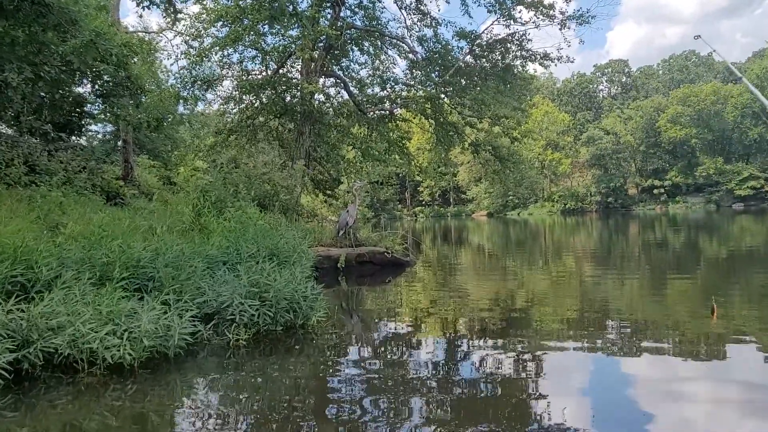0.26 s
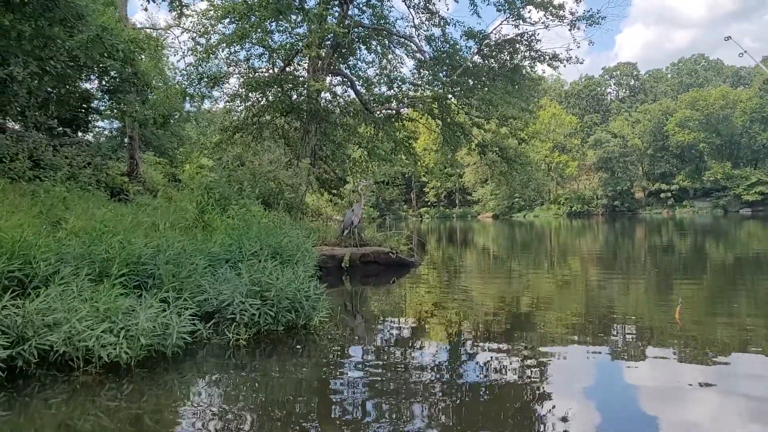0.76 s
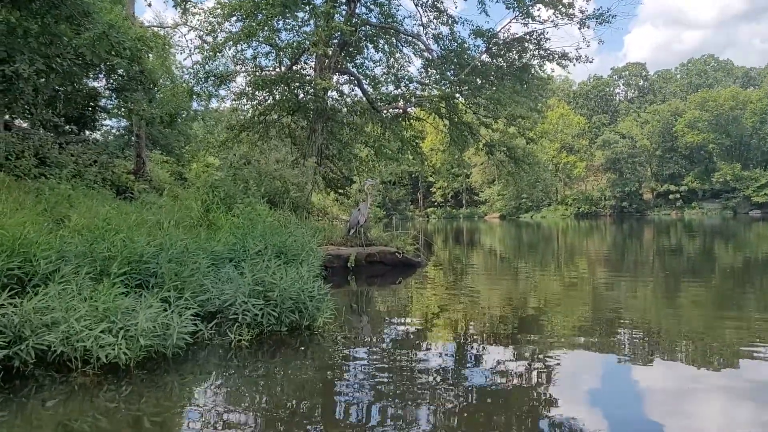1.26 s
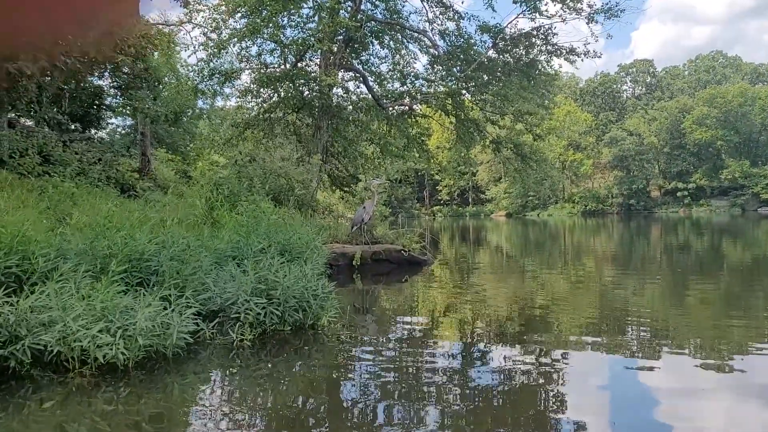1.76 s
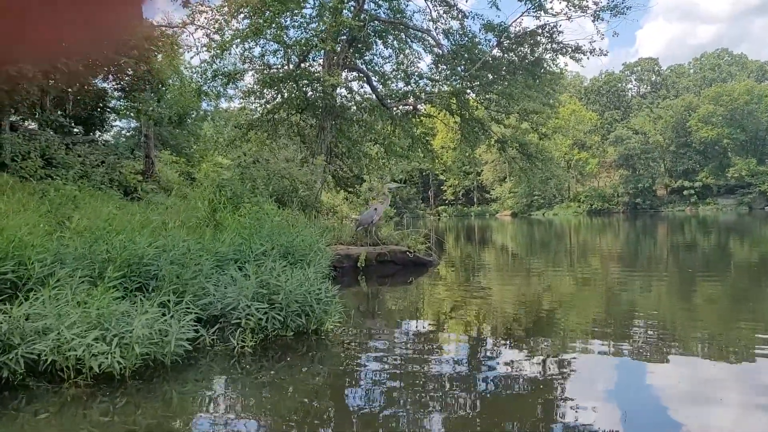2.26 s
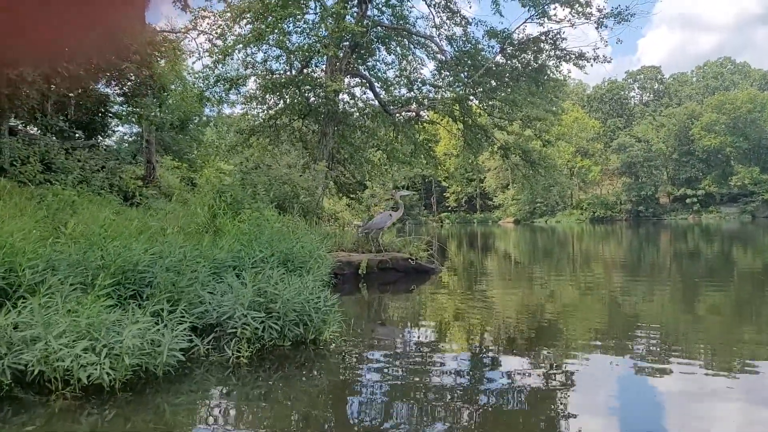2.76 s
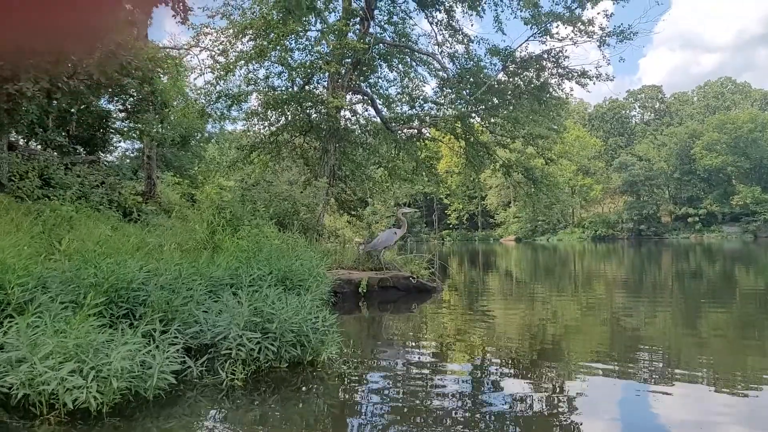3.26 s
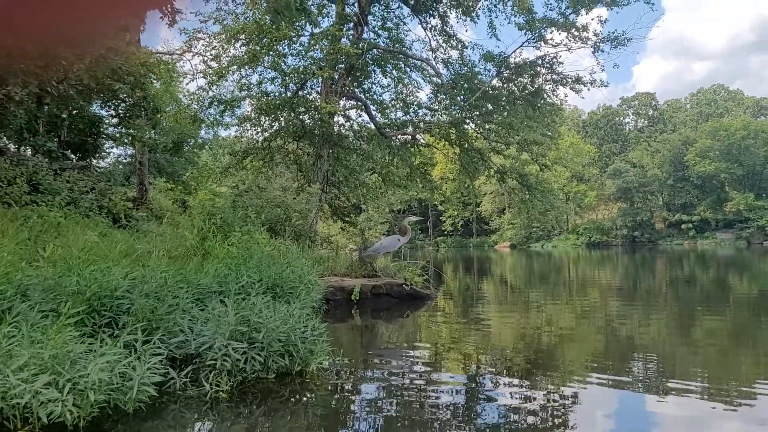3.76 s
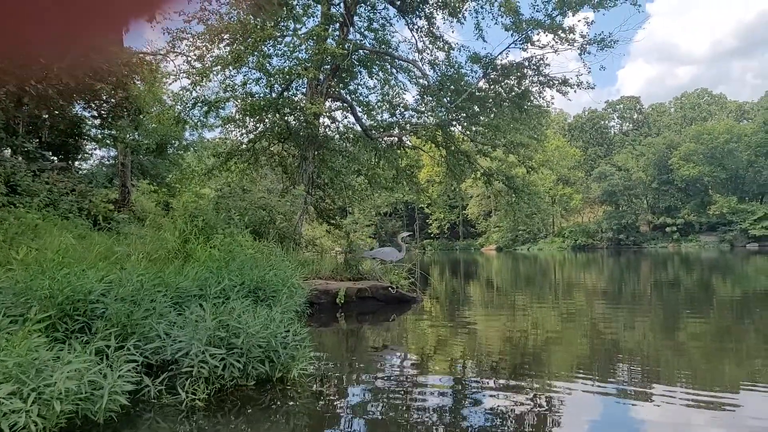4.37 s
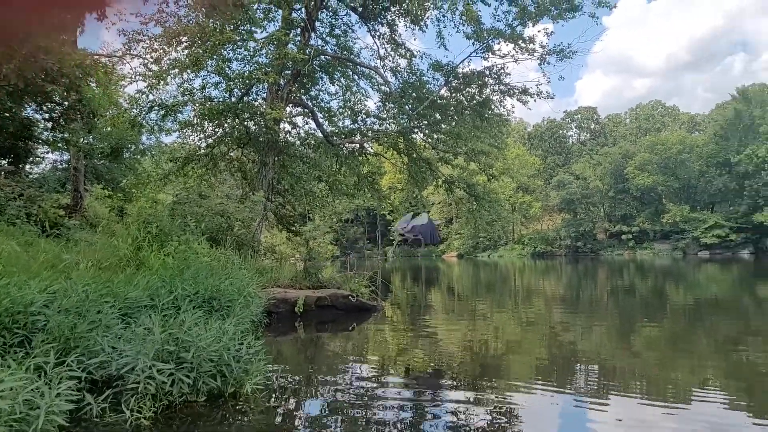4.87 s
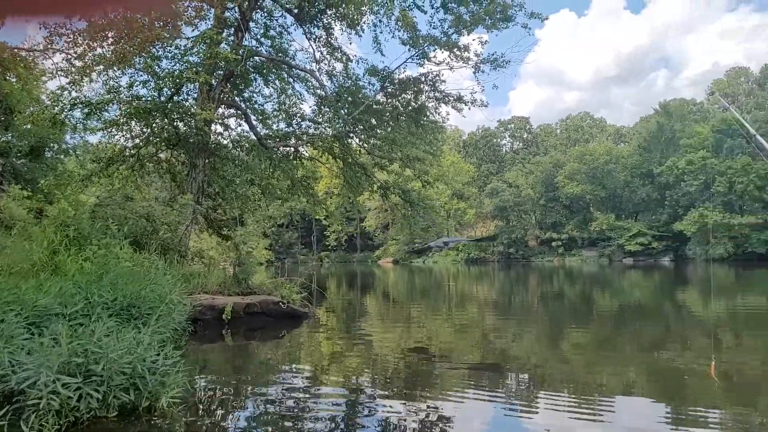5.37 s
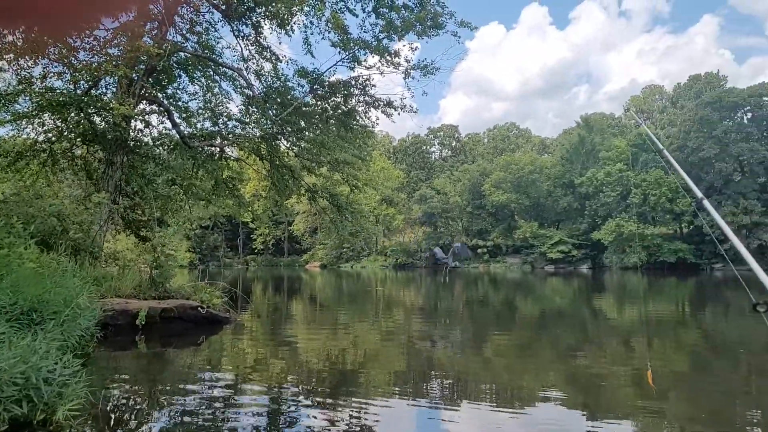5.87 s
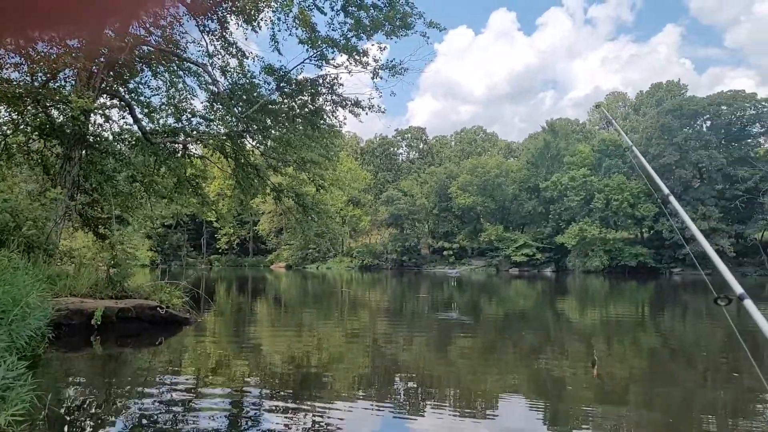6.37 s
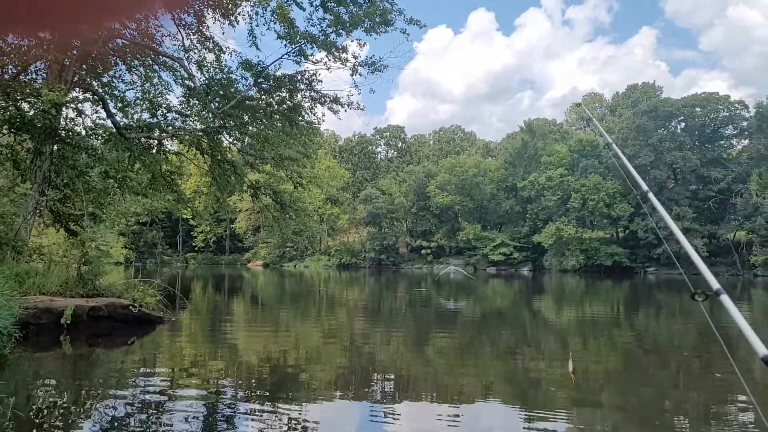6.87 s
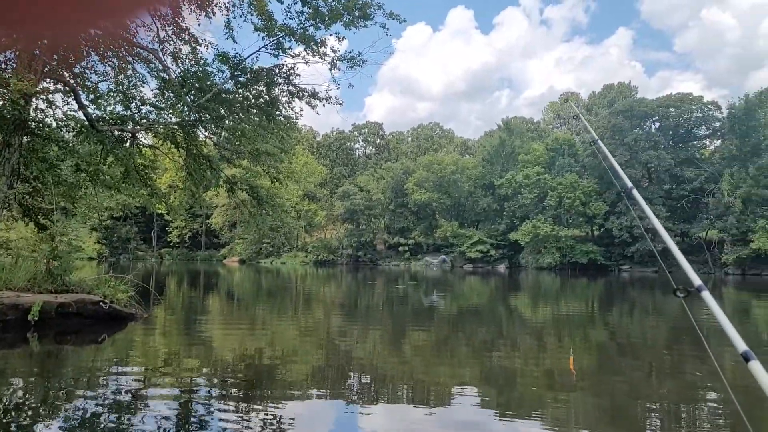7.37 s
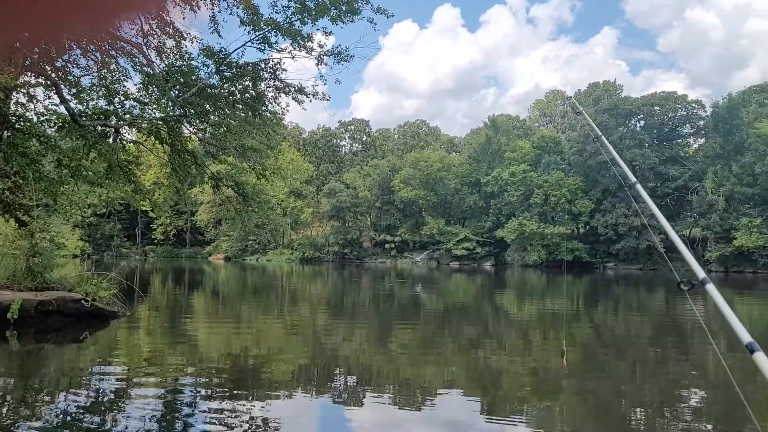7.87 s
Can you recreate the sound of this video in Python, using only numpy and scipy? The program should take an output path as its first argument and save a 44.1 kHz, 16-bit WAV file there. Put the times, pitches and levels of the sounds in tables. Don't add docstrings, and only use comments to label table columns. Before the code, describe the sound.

A bright, raspy cicada dominates, faltering and swelling before holding its drone, with a softer distant insect chorus around it. Dry little ticks, one sharp snap and faint rustles sit very close to a handheld stereo microphone. Small rising bird whistles come from afar. In the second half a large bird croaks five times, hoarse and throaty, across open water with slight bank echo, over faint rumble and engine hum.

```python
import sys
import numpy as np
from scipy import signal
from scipy.fft import rfft, irfft
from scipy.io import wavfile
from scipy.ndimage import uniform_filter1d, map_coordinates

SR = 44100
rng = np.random.default_rng(int(sys.argv[2]) if len(sys.argv) > 2 else 0)


def to_wav(s):
    ch = np.atleast_2d(s).T
    pcm = np.round(np.clip(ch, -1, 1) * 32767)
    wavfile.write(sys.argv[1], SR, pcm.astype(np.int16))


def to_linear_factor(level_db):
    exponent = np.asarray(level_db, float) / 20
    return 10 ** exponent


N = 358091
TIME = np.arange(N) / SR


def unit(x):
    return x / np.sqrt(np.mean(x ** 2) + 1e-20)


def read(rows, t):
    s, *cols = np.transpose(rows)
    return [np.interp(t, s, c) for c in cols]


def along(points, hz):
    f, v = np.transpose(points)
    return np.interp(np.log(hz + 1), np.log(f + 1), v)


def wobble(rate):
    return map_coordinates(rng.standard_normal(int(N * rate / SR) + 4), [TIME * rate])


def beats(rate, t):
    total = np.cumsum(rate) / SR
    return np.interp(np.arange(int(total[-1]) + 1), total - total[0], t)


def rings(s, hz, size, t60, rise, phase=0, count=144):
    s, hz, size, phase = (np.reshape(v, (-1, 1)) for v in np.broadcast_arrays(s, hz, size, phase))
    index = np.ceil(s * SR) + np.arange(count)
    t = index / SR - s
    envelope = size * to_linear_factor(-60 * t / t60) * (1 - np.exp(-t / rise)) ** 2
    wave = envelope * np.sin(2 * np.pi * (hz * t + phase))
    return np.bincount(index.astype(int).ravel(), wave.ravel(), N + SR)[:N]


def rush(spectrum, alike, patchy_db):
    hz, _, z = signal.stft(rng.standard_normal((2, N)), SR, nperseg=2048)
    patches = uniform_filter1d(rng.standard_normal(z.shape[1:]), size=8, axis=0)
    patches = uniform_filter1d(patches, size=4, axis=1)
    turn = np.arccos(np.clip(along(alike, hz), -1, 1))[:, None] / 2
    mid, side = z[0] * np.cos(turn), z[1] * np.sin(turn)
    gain_db = along(spectrum, hz)[:, None] + patchy_db * unit(patches)
    z = np.array([mid + side, mid - side]) * to_linear_factor(gain_db)
    return unit(signal.istft(z, SR, nperseg=2048)[1][:, :N])


def scatter(x, t60, count):
    tail = rng.standard_normal((2, count)) * to_linear_factor(-60 * np.arange(count) / SR / t60)
    return signal.fftconvolve(x[None], tail / np.linalg.norm(tail[0]), axes=1)[:, :N]


def swaying(x, t60, sway):
    turn = 2 * wobble(sway)
    return scatter(x * np.cos(turn), t60, count=3072) + scatter(x * np.sin(turn), t60, count=3072)


def placed(x, pan_db, count=0):
    return np.array([x * to_linear_factor(pan_db / 2), np.roll(x, count) * to_linear_factor(-pan_db / 2)])


def cicada():
    # start_s, buckles_per_s
    buckling = [(0, 337), (.4, 334), (.7, 333.4), (.95, 329), (1.45, 327), (2.2, 324), (3.2, 316),
                (3.7, 310), (4.1, 306), (4.4, 309), (4.5, 306), (4.95, 305), (5.15, 301.4), (5.4, 304),
                (5.6, 302), (5.77, 304), (6.45, 306.6), (8.2, 306.1)]
    # start_s, tymbal_hz, left_right_db,
    # belly_lift_db
    tone_and_place = [(0.0, 12460, -2.5, -11), (1.1, 13130, -6.5, -12.5), (1.72, 12920, -1, -17),
                      (2.08, 12980, 3, -16.5), (3.2, 12250, 3.5, -19), (4.27, 12350, 5.5, -14.5),
                      (5.25, 12660, 3, -12.5), (8.12, 12350, 5.5, -12)]
    # delay_ms, level_db, relative_pitch
    ribs = [(0, -5, 1.03), (1.078, -0.5, 0.997), (2.148, -5, 0.962)]
    # pitch_hz, level_db
    belly = [(4050, -7), (4560, 0), (5200, -12)]
    # start_s, end_s
    in_step = [(.3, .7), (6.805, 8.2)]
    s = beats(read(buckling, TIME)[0] + .35 * wobble(8), TIME)
    steady = sum((s > a) & (s < b) for a, b in in_step)
    phase = np.cumsum(.5 - .5 * steady)[:, None]
    delay_ms, rib_db, rib_pitch = np.transpose(ribs)
    chance = rng.standard_normal((len(s), 4, len(ribs)))
    struck = s[:, None] + delay_ms / 1000 * (1 + .012 * chance[:, 3]) + 9e-6 * chance[:, 0]
    size = to_linear_factor(rib_db + 1.8 * chance[:, 1])
    level_db = effort()
    effort_db = np.interp(struck, TIME, level_db - uniform_filter1d(level_db, size=SR // 2))
    tymbal_hz = read(tone_and_place, struck)[0] * rib_pitch * (1 + 0.011 * chance[:, 2])
    tymbal_hz *= 1 + .006 * np.clip(effort_db, -10, 5)
    _, pan_db, belly_db = read(tone_and_place, TIME)
    song = unit(rings(struck, tymbal_hz, size, 0.0029, 0.0006, phase))
    song += to_linear_factor(-18) * unit(rings(struck, 1.18 * tymbal_hz, size, 0.0025, 0.00074, phase))
    song += to_linear_factor(-11.5) * unit(rings(struck, 0.71 * tymbal_hz, size, 0.0041, 0.00013, 2 * phase))
    first = struck[:, :1]
    tension = read(tone_and_place, first)[0] / 12475
    for hz, db in belly:
        thump = rings(first, hz * tension, size[:, :1], .008, .0009, phase, count=384)
        song += to_linear_factor(belly_db + db) * unit(thump)
    song *= to_linear_factor(level_db)
    heard = placed(song, 7, count=16) + to_linear_factor([[-3], [-1.5]]) * swaying(song, .06, 5)
    return to_linear_factor(-0.77) * heard * to_linear_factor([pan_db / 2, -pan_db / 2])


def effort():
    # start_s, level_db
    pull = [(0, -34.5), (0.5, -38), (1.6, -34), (2.3, -38.5), (2.75, -38), (3.05, -32), (4.6, -34.5),
            (5.08, -32.5), (5.25, -34), (5.8, -32), (6.33, -30.5), (6.5, -32.5), (8.12, -34.5)]
    # deepest_s, fall_s, recovery_s, depth_db
    falters = [(0.06, 0.19, 0.072, 14), (0.334, 0.091, 0.04, 24), (0.399, 0.05, 0.1, 23.2),
               (0.815, 0.056, 0.15, 6), (1.446, 0.14, 0.059, 4), (1.625, 0.044, 0.15, 6),
               (1.855, 0.043, 0.035, 3.5), (2.04, 0.071, 0.22, 6), (2.511, 0.12, 0.049, 16),
               (2.57, 0.018, 0.122, 5), (2.882, 0.112, 0.11, 16), (3.024, 0.023, 0.11, 11),
               (3.226, 0.14, 0.075, 13), (3.406, 0.057, 0.133, 8.5), (3.597, 0.14, 0.023, 5.5),
               (3.814, 0.079, 0.077, 11), (3.908, 0.037, 0.1, 9.5), (4.214, 0.1, 0.071, 6.5),
               (4.33, 0.074, 0.055, 6), (4.575, 0.022, 0.098, 1.9), (4.699, 0.092, 0.082, 7),
               (4.875, 0.12, 0.101, 15), (5.827, 0.019, 0.22, 3), (6.805, 0.015, 0.019, 14),
               (7.368, 0.041, 0.039, 3)]
    level_db = read(pull, TIME)[0] + 1.6
    for s, fall, recovery, depth_db in falters:
        away = np.maximum((s - TIME) / fall, (TIME - s) / recovery)
        level_db = level_db - depth_db * np.cos(np.pi / 2 * np.minimum(away, 1)) ** 2
    return level_db


def heron():
    # start_s, level_db, flaps_per_s, harshness (0-1), chest_hz
    croaks = [
        [(5.082, -45.5, 90, 0.6, 770), (5.123, -33, 70, 0.2, 805), (5.21, -39, 81, 0.76, 815),
         (5.29, -36, 69.6, 0.99, 853), (5.35, -32, 71, 0.23, 830), (5.47, -28, 88, 0, 870),
         (5.56, -32.5, 66.5, 0.7, 950), (5.627, -29, 67.6, 0, 926), (5.66, -36.5, 59, 0.35, 870)],
        [(5.833, -37, 52.3, .15, 817), (5.94, -35.5, 69, 0.26, 880), (6.01, -35.5, 48, 0.12, 860)],
        [(6.193, -42, 70, 0.27, 780), (6.29, -36.5, 66, 0.38, 855), (6.38, -43, 68, 0.4, 855)],
        [(6.905, -37.5, 66, 0.36, 825), (6.99, -33, 53, 0.11, 873), (7.12, -34, 54, 0.19, 863),
         (7.265, -43, 51, 0.49, 830)],
        [(7.832, -45.5, 52, 0.27, 820), (7.9, -37, 70, 0.1, 840), (7.977, -31.5, 85.5, 0.22, 1225),
         (8.017, -29.5, 74, 0.11, 1050), (8.04, -34, 69, 0.77, 790)],
    ]
    # low_mode_db, beak_mode_db, rasp_db
    voicing = [(-18, -21, -12), (-15.5, -18.5, -21), (-16.5, -22.5, -19), (-21, -12.5, -16),
               (-37, -11.5, -14)]
    # start_s, level_db
    grunt = [(4.912, -33), (4.925, -31)]
    voice = sum(croak(rows, *throat) for rows, throat in zip(croaks, voicing))
    s, db = np.transpose(grunt)
    voice += rings(s, 453, to_linear_factor(db), 0.025, 0.0012, count=2048)
    voice += rings(s, 776, to_linear_factor(db - 5.5), 0.032, 0.00061, count=2048)
    voice += to_linear_factor(-12) * np.roll(voice, round(.0075 * SR))
    return placed(voice, 4.5, count=4) + to_linear_factor(-14) * scatter(voice, .15, count=8000)


def croak(rows, low_db, open_db, rasp_db):
    # pitch_hz, t60_s
    throat_modes = [(500, .045), (1530, .024), (1210, .02)]
    # pitch_hz, level_db
    rasp_modes = [(1850, -2.5), (2050, -5.5), (2250, 0.5), (2500, -1.5), (2750, -0.5), (2950, 0),
                  (3200, -4.5), (3500, -6)]
    chest_t60 = .021
    t = np.arange(rows[0][0], rows[-1][0], 1 / SR)
    s = beats(2 * read(rows, t)[1], t)
    chance = rng.standard_normal((len(s), 5 + 3 * len(rasp_modes)))
    chest_db, _, harsh, chest_hz = read(rows, s)
    harsh = np.clip(harsh, 0, 1)
    done = (s - t[0]) / (t[-1] - t[0])
    low_db = low_db + 12 * harsh
    open_db = open_db + 20 * np.log2(chest_hz / 830) + 2.5 * done ** 2
    rasp_db = rasp_db + 8.5 * harsh - 17.5 * (done - 0.27) ** 2
    s = s + 0.00208 * harsh * chance[:, 0]
    size = np.where(np.arange(len(s)) % 2, harsh, 1) * to_linear_factor(chest_db + 15.5 + 1.65 * chance[:, 1])
    voice = rings(s, chest_hz * (1 + .03 * chance[:, 2]), size, chest_t60, .0016, count=1024)
    voice += rings(s, 0.9 * chest_hz, size * to_linear_factor(-5), chest_t60, 0.0016, count=1024)
    for k, ((hz, t60), db) in enumerate(zip(throat_modes, (low_db, open_db, open_db - 1))):
        mode_hz = hz * (1 + .03 * chance[:, 3 + k % 2])
        voice += rings(s, mode_hz, size * to_linear_factor(db), t60, .002, count=1536)
    late, detune, strength = np.split(chance[:, 5:], 3, axis=1)
    rasp_hz, mode_db = np.transpose(rasp_modes)
    spray = (size * to_linear_factor(rasp_db - 6.5))[:, None] * to_linear_factor(mode_db + 2.1 * strength)
    unswelled = np.exp((t[0] - s[:, None]) / 0.075)
    spray *= to_linear_factor(-16 * unswelled * (rasp_hz - rasp_hz[0]) / 1000)
    spray_s = s[:, None] + 0.0036 * abs(late)
    return voice + rings(spray_s, rasp_hz * (1 + 0.038 * detune), spray, 0.037, 0.00097, count=1024)


def ticks():
    # start_s, peak_db, ring_hz, knock_db (relative), left_right_db
    touches = [(1.8203, -46.5, 3300, 2.5, -22), (2.5212, -33, 2800, -18, 15),
               (2.5932, -31.5, 3140, -4.5, 6), (2.916, -42, 2930, -10, 6), (3.26, -39, 2000, -34, 17),
               (3.281, -34.5, 3230, -8, 15), (3.3025, -29.5, 3330, -18, 4), (3.316, -34.5, 2660, -9, 13),
               (3.961, -34, 2850, -26, 15), (4.006, -29, 3300, -11, 10), (4.0495, -30, 3360, -9, -1),
               (4.06, -28.5, 3300, -6, 6), (4.0744, -34, 2730, -10, 18), (4.142, -46, 2270, 6, 17),
               (4.16, -33.5, 3080, -6, 1.0), (4.3173, -45.5, 3220, 0, 14), (6.204, -36, 2670, -3, 17),
               (7.734, -46, 2610, -9, 7), (7.7592, -34.5, 2640, -5, 13)]
    out = 0
    for s, db, hz, knock_db, pan_db in touches:
        modes = np.array([hz, 1.143 * hz, 0.7 * hz, 1350, 5700, 7300, 10500, 14500])
        crack_db = -9 + np.array([0, 0.55, -1.5, -1.5])
        size = to_linear_factor(db + np.array([1.5, -3.5, -4.5, knock_db, *crack_db]))
        size *= to_linear_factor(rng.normal(0, 2, len(modes)))
        out = out + placed(rings(s, modes, size, 0.0098, 0.00025, count=640), pan_db)
    return out + to_linear_factor(-9) * scatter(out.sum(axis=0), .04, count=2048)


def snap():
    # start_s, level_db
    taut = (2.913, -24)
    t = TIME - taut[0]
    envelope = to_linear_factor(taut[1] - 60 * abs(t) / 0.0093) * (t > 0)
    return envelope * np.diff(rng.standard_normal((2, N + 1))) * to_linear_factor([[2.5], [-2.5]])


def rustles():
    # start_s, length_s, level_db
    brushes = [(0.073, 0.14, -56.5), (1.363, 0.1, -57), (1.77, 0.12, -51.5), (2.47, 0.063, -50),
               (4.914, 0.1, -51), (7.724, 0.058, -42.5)]
    # pitch_hz, level_db (per Hz)
    cloth = [(300, -8), (800, 1), (1500, 1), (2800, 1.5), (4500, 4), (9000, -36)]
    swell = sum(to_linear_factor(db) * np.sin(np.pi * np.clip((TIME - s) / length, 0, 1)) for s, length, db in brushes)
    return swell * to_linear_factor(3.3 * wobble(150)) * rush(cloth, [(1000, 0.27)], patchy_db=6.0)


def chips():
    # start_s, length_s, start_hz, end_hz, level_db
    whistles = [(2.017, 0.054, 2120, 2400, -75), (2.434, 0.038, 2020, 2260, -62),
                (2.638, .02, 1950, 2000, -65), (2.719, 0.016, 1950, 2000, -69),
                (3.467, 0.015, 2610, 2740, -53.5), (3.556, 0.05, 2630, 3100, -52),
                (3.86, 0.019, 2830, 2850, -62), (4.146, 0.02, 2650, 3050, -50),
                (4.166, 0.036, 2740, 2900, -46), (4.636, 0.031, 2820, 2860, -53),
                (4.717, 0.079, 2550, 3120, -54.5), (5.79, 0.04, 2810, 3100, -60),
                (6.127, .04, 2160, 2600, -61), (6.811, 0.065, 2080, 2600, -58),
                (7.247, 0.077, 2086, 2400, -58), (7.768, 0.068, 2220, 2440, -55)]
    out = np.zeros(N)
    for s, length, hz0, hz1, db in whistles:
        u = np.arange(round(length * SR)) / (length * SR)
        cycles = length * (hz0 * u + (hz1 - hz0) * u ** 2 / 2)
        whistle = to_linear_factor(db + 12.0) * np.sin(np.pi * u) * np.sin(2 * np.pi * cycles)
        out[round(s * SR):][:len(u)] += whistle
    out *= to_linear_factor(-4 + 4.5 * wobble(120))
    return placed(out, 1.5, count=5) + to_linear_factor(-6) * scatter(out, .09, count=6000)


def chorus():
    # pitch_hz, level_db (per Hz)
    bands = [(2400, -50), (3000, -22.5), (3700, -8), (4100, -2), (4800, -4), (5400, -14.5), (6600, -20),
             (8300, -11), (9200, -6.5), (10500, -9), (12600, 0), (13800, -4), (15300, -6), (16200, -33)]
    # start_s, level_db
    chorus_level = [(0.0, -43.5), (0.13, -44), (1.22, -42.5), (3.05, -44.5), (4.59, -41), (4.73, -42.5),
                    (6.2, -43.5), (8.12, -41)]
    swell_db = .7 * wobble(3) + .5 * wobble(11)
    level_db = read(chorus_level, TIME)[0] + swell_db
    hiss = rush(bands, [(3000, .05)], patchy_db=.6)
    return to_linear_factor(level_db + 5.5) * hiss * to_linear_factor([[1.7], [-1.7]])


def air():
    # pitch_hz, level_db (per Hz)
    rumble = [(13, -56), (22, 8.5), (112, -4), (283, -13.5), (424, -14), (478, -22), (687, -21),
              (911, -29.5), (1050, -27), (1310, -32), (1960, -33), (2300, -34), (2700, -31), (3510, -43),
              (5940, -120)]
    # start_s, level_db
    rumble_level = [(0.0, -45.5), (0.41, -48), (5.06, -43.5), (5.2, -39), (7.17, -43), (7.89, -42.5),
                    (8.12, -40.5)]
    # pitch_hz, likeness (0-1)
    likeness = [(30, 0.69), (100, 1), (300, 0.34), (900, 0.022), (2500, 0.013)]
    # start_s, pitch_hz, level_db
    engines = [
        [(0, 92, -51.5), (4, 93.26, -54), (6.4, 96, -52.5), (7.2, 97.2, -41.5), (7.5, 97.8, -61),
         (8.12, 94, -53)],
        [(0, 125.4, -50), (1.4, 113.1, -50.5), (2.5, 122.8, -50.5), (4.8, 128.9, -52.5), (6.3, 135.7, -51),
         (7, 151.8, -49.5), (7.6, 148, -56), (8.12, 130, -46)],
        [(0, 185, -72), (.7, 182, -52), (1.3, 173.6, -57), (3.4, 184.4, -60.5), (4.5, 196.5, -71),
         (8.12, 190.7, -69)],
        [(0, 213.2, -61.5), (5.5, 213.3, -55), (6, 211, -57.5), (8.12, 213, -87)],
    ]
    swell_db = .7 * wobble(4)
    level_db = read(rumble_level, TIME)[0] - 0.14 + swell_db
    bed = to_linear_factor(level_db) * rush(rumble, likeness, patchy_db=1.9)
    for rows in engines:
        hz, db = read(rows, TIME)
        level = to_linear_factor(db - 0.5 + 2.43 * wobble(6.4))
        bed += level * np.sin(2 * np.pi * np.cumsum(hz + 0.83 * wobble(9)) / SR)
    return bed


def scene():
    return cicada() + chorus() + heron() + ticks() + snap() + chips() + rustles() + air()


def roll_off(x):
    return signal.sosfilt(signal.butter(12, 16000, fs=SR, output="sos"), x)


def record(dry):
    hz = np.fft.rfftfreq(N, 1 / SR)
    bass_cut = hz ** 4 / (hz ** 4 + 44 ** 4)
    kept = irfft(rfft(dry) * (hz < 15800) * bass_cut, N)
    return roll_off(kept)


dry = scene()
out = record(dry)
to_wav(out)
```